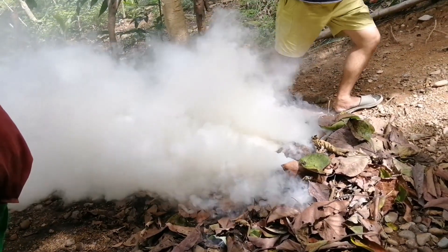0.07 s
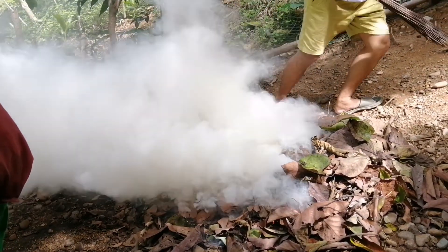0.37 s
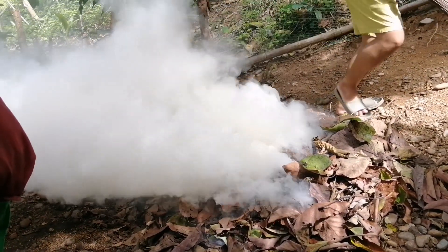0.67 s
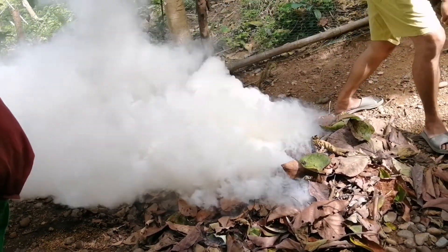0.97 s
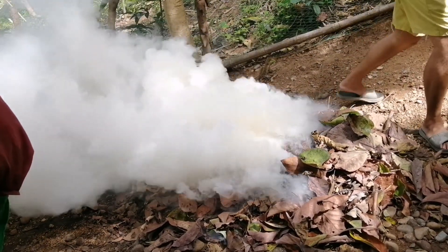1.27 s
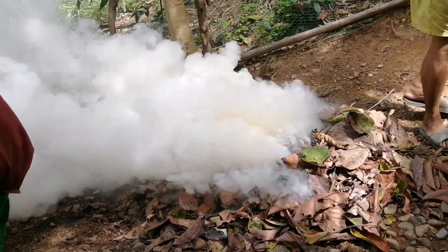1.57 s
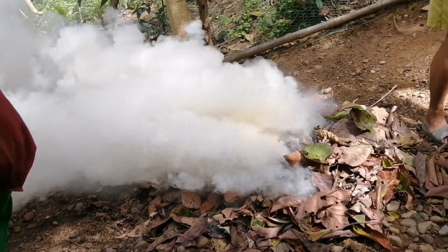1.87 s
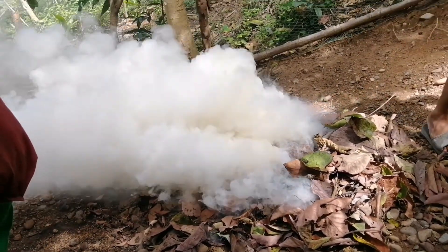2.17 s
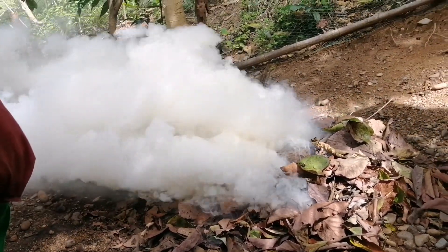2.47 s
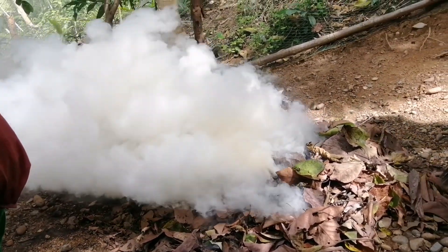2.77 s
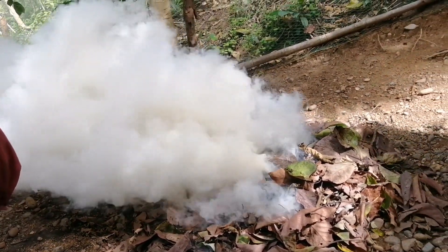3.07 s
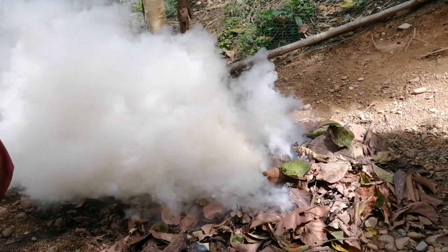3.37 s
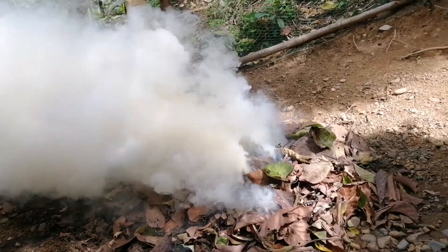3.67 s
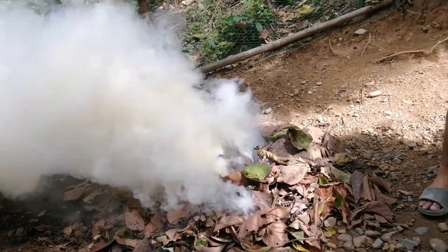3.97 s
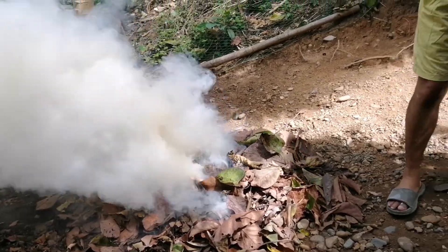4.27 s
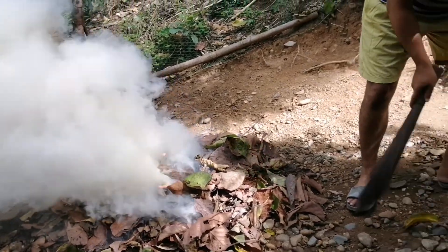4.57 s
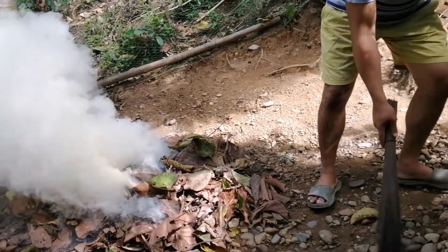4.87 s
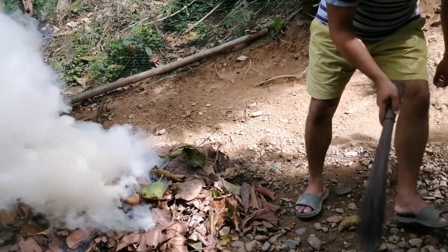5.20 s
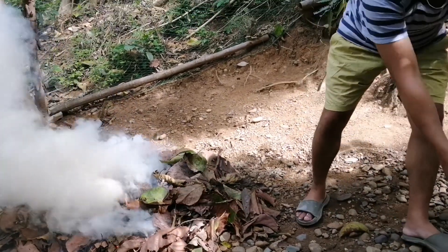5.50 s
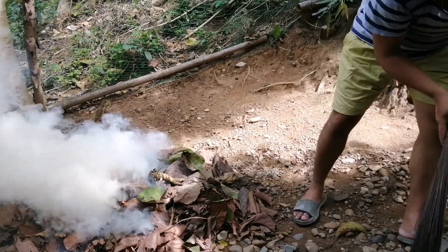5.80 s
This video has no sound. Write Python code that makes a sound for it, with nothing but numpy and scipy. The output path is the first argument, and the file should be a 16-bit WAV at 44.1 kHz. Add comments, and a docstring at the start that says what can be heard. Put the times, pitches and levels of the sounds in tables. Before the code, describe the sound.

A stiff broom swishes through dry leaves near the microphone, a little to the right, in quick scratchy strokes with sharp twig snaps and the crackle of settling leaves. Before the sweeping starts come a few sandal scuffs, cracking stalks and small chirps. A smouldering leaf pile ticks very faintly. The open-air background of low rumble, far engine throb and a whooping bird dips at each stroke and swells back.

```python
"""A sandal scuffs and dry stalks snap outdoors, over a low rumble and a distant one-cylinder engine.
A far bird whoops over and over, a smaller one chirps, rubber soles squeak. Then a stiff stick broom,
to the right of the microphone, sweeps dry leaves toward a faintly ticking, smouldering pile. Each swish
is a dense train of tiny impulses from leaf edges and leaves a rustle of settling leaves behind it.
Gain control ducks the background at every swish and lets it swell back."""
import sys
import numpy as np
from scipy import signal
from scipy.fft import rfft, irfft
from scipy.io import wavfile
from scipy.ndimage import uniform_filter1d, map_coordinates

SR = 44100
rng = np.random.default_rng(int(sys.argv[2]) if len(sys.argv) > 2 else 0)


def generate_wav(signal):
    """Clip the signal to [-1, 1] and save it as 16-bit WAV at the path in sys.argv[1]."""
    frames = np.transpose(np.atleast_2d(signal))
    scaled = np.clip(frames, -1, 1) * 32767
    pcm = np.round(scaled).astype(np.int16)
    wavfile.write(sys.argv[1], SR, pcm)


N = 266408
T = np.arange(N) / SR


def amp(db):
    """Amplitude ratio of a level in decibels."""
    return 10 ** (np.asarray(db) / 20)


def unit(x):
    """Normalisation to rms 1."""
    return x / np.sqrt(np.mean(x ** 2) + 1e-20)


def read(points, hz):
    """Interpolation on a log-frequency axis."""
    f, value = np.transpose(points)
    return np.interp(np.log(hz + 1), np.log(f + 1), value)


def shaped(x, response):
    """Zero-phase filtering by a function of frequency."""
    size = x.shape[-1]
    return irfft(rfft(x) * response(np.fft.rfftfreq(size, 1 / SR)), size)


def coloured(x, points):
    """Spectral shaping by a table of levels, at rms 1."""
    return unit(shaped(x, lambda hz: amp(read(points, hz))))


def add(mix, s, sound):
    """Superposition of a sound on the mix at time s."""
    part = mix[..., max(round(s * SR), 0):][..., :sound.shape[-1]]
    part += sound[..., :part.shape[-1]]


def pair(size, correlation):
    """Two channels of partly correlated white noise."""
    a, b = rng.standard_normal((2, size))
    return np.array([a, correlation * a + np.sqrt(1 - correlation ** 2) * b])


def wander(shape, samples):
    """Slow fluctuation: a moving average of noise, at rms 1."""
    return unit(uniform_filter1d(rng.standard_normal(shape), size=samples))


def swell(t, peak_s):
    """Critically damped envelope: a quick rise to 1 and a slower fall."""
    return t / peak_s * np.exp(1 - t / peak_s)


def smoothed(x, seconds):
    """First-order lag with the given time constant."""
    keep = np.exp(-1 / (seconds * SR))
    return signal.lfilter([1 - keep], [1, -keep], x)


def air(level_db=-45.5, rumble_hz=81):
    """Diffuse field: outdoor rumble and foliage hiss, coherent at the two ports only for long waves."""
    # ambient spectrum: (frequency [Hz], relative level [dB])
    spectrum = [(15, -8.5), (45, 5), (80, 4), (130, 3), (200, -10), (300, -7.5), (550, -13.5), (850, -12),
                (1400, -21), (3000, -24), (4500, -24), (8000, -35.5), (11000, -36.5), (16000, -65)]
    # likeness of the two microphone ports: (frequency [Hz], correlation [0-1])
    coherence = [(30, 0.9), (150, 0.72), (350, 0.93), (700, 0.45), (2000, 0), (15000, 0)]
    # drift of the deep rumble: (time [s], gain [dB])
    rumble_drift = [(0, -1.5), (4.2, -2), (4.8, 3), (6.04, 5.5)]
    left, other = rng.standard_normal((2, N))
    right = shaped(left, lambda hz: read(coherence, hz))
    right += shaped(other, lambda hz: np.sqrt(1 - read(coherence, hz) ** 2))
    wash = amp(level_db) * coloured(np.array([left, right]), spectrum)
    deep = shaped(wash, lambda hz: 1 / (1 + (hz / rumble_hz) ** 4))
    return wash - deep + deep * amp(np.interp(T, *np.transpose(rumble_drift)))


def engine(swell_s=0.0064, lead_s=0.0055, harmonic_db=-19):
    """Pulsed resonance: each firing rings the exhaust for a few cycles; only the bass carries this far."""
    # engine speed: (time [s], firing rate [1/s])
    speed = [(0.0, 22.39), (1.25, 21.7), (1.75, 23.22), (2.8, 23.4), (3.25, 22.14), (4.8, 23.13),
             (6.04, 23.69)]
    # drift of the exhaust: (time [s], level [dB], resonance [Hz])
    exhaust = [(.3, -30.5, 119), (1.0, -34, 119.7), (2.2, -34.5, 120), (3.3, -34.5, 127), (4.6, -34, 131.4),
               (6.04, -29.5, 139)]
    when, levels, resonances = np.transpose(exhaust)
    cycles = np.cumsum(np.interp(T, *np.transpose(speed))) / SR
    firings = T[1:][np.diff(np.floor(cycles)) > 0]
    t, out = np.arange(SR // 16) / SR, np.zeros(N)
    for s in firings:
        hz = np.interp(s, when, resonances) * (1 + 0.014 * rng.standard_normal())
        thud = -swell(t, swell_s) * np.cos(2 * np.pi * hz * (t - lead_s))
        add(out, s - lead_s, amp(np.interp(s, when, levels)) * thud)
    second_harmonic = amp(np.mean(levels) + harmonic_db) * np.sin(2 * np.pi * 2 * cycles)
    return out + second_harmonic


def sandals(scuff_peak_s=0.013, roughness=0.057):
    """Friction: grit rolls under a sole as band noise; stick-slip of rubber gives short, uneven squeaks."""
    # scuffs on packed earth: (time [s], level [dB], centre [Hz], width [Hz])
    scuffs = [(0, -39.5, 464, 300), (.327, -42.5, 1150, 2450), (.698, -46, 2160, 870),
              (.861, -45, 2450, 1030), (5.369, -43.5, 700, 1760), (5.403, -39, 600, 149),
              (5.49, -46, 280, 200)]
    # sole squeaks: (time [s], duration [s], level [dB], start pitch [Hz], end pitch [Hz])
    squeaks = [(0.862, 0.0174, -28, 1843, 2130), (1.011, 0.021, -35, 2000, 1880)]
    t, out = np.arange(SR // 3) / SR, np.zeros((2, N))
    for s, db, hz, width in scuffs:
        grit = unit(shaped(pair(len(t), 0.52), lambda f: 1 / (1 + ((f - hz) / width) ** 2) ** 2))
        add(out, s, amp(db) * grit * swell(t, scuff_peak_s))
    for s, length, db, start_hz, end_hz in squeaks:
        slide = np.minimum(t / length, 1)
        slip = 1 + roughness * wander(len(t), 40)
        cycles = np.cumsum((start_hz + (end_hz - start_hz) * slide) * slip) / SR
        add(out, s, amp(db) * np.sqrt(2) * np.sin(np.pi * slide) * np.sin(2 * np.pi * cycles))
    return out


def snaps(wood_hz=3050, wood_s=0.00097, splinter_s=0.0016, scatter_s=0.034, twig_count=14):
    """Brittle fracture: a stalk breaks in one impulse, rings, splinters and shakes the leaves nearby."""
    # larger stalks breaking: (time [s], level [dB], low knock [dB], treble crispness [dB])
    stalks = [(0.054, -23.5, -23, -2.5), (.432, -19.5, -0.5, -2), (.895, -45.5, -13, 18),
              (1.143, -32.5, -10, -2), (1.37, -44.5, -3, 4), (1.6332, -37.5, -4, 0.5), (2.047, -36, 3, -2),
              (2.141, -28, -23, -10.5), (2.308, -24, -26, 3), (2.482, -33, -34, 1), (3.21, -40.5, -13, 7),
              (3.8637, -32, -2.5, -1.5), (3.894, -36, -22, -3), (3.9378, -38.5, -11, -5),
              (3.992, -36, -19, -1.5), (4.1344, -28, -6, 7.5), (4.5086, -36, -6, 10.5),
              (4.805, -33, -18, 15), (5.089, -16.5, -20, -10), (5.192, -23.5, -5.5, 4.5),
              (5.6105, -35, -3, 5.5), (5.9574, -26.5, -2.5, -2.5)]
    # thin twigs break at random; same columns
    twigs = [(when * T[-1], -54 + 10 * force, -10, 5.5) for when, force in rng.random((twig_count, 2))]
    t, out = np.arange(-64, 4032) / SR, np.zeros((2, N))
    ring = amp(-22) * np.exp(-abs(t) / wood_s) * np.cos(2 * np.pi * wood_hz * t)
    crack = (t == 0) + (t > 0) * ring
    debris = (t > 0) * (amp(-11) * np.exp(-abs(t) / splinter_s) + amp(-34) * np.exp(-abs(t) / scatter_s))
    for s, db, knock_db, crisp_db in stalks + twigs:
        colour = [(60, knock_db + 5), (300, knock_db - 9.5), (1200, knock_db), (3000, 0),
                  (6500, crisp_db), (10500, crisp_db - 11.5), (16000, crisp_db - 22)]
        snap = coloured(crack + debris * pair(len(t), 0.22), colour)
        crack_rms = np.sqrt(np.mean(snap[:, t < 0.0035] ** 2))
        add(out, s + t[0], amp(db) * snap / crack_rms)
    return out


def whooping_bird(first_s=0.105, period_s=0.2288, length_s=0.18, low_hz=690, high_hz=990):
    """Glide and echo: a far bird repeats a rising whoop, and the hillside reflects it."""
    # strength of the whoops: (time [s], relative level [dB])
    levels = [(.2, -49.5), (1.6, -47.5), (3.2, -49), (4.6, -58), (5.8, -49)]
    echo_s, echo_db = 0.19, -2
    slide, out = np.linspace(0, 1, int(length_s * SR)), np.zeros(N)
    envelope = np.sin(np.pi * slide ** 1.6)
    starts = np.arange(first_s, T[-1], period_s)
    for s, (late, force, detune) in zip(starts, rng.standard_normal((len(starts), 3))):
        hz = (low_hz + (high_hz - low_hz) * slide ** 1.5) * (1 + 0.0142 * detune)
        flutter = unit(0.75 + wander(len(slide), 500))  # many paths through the trees
        gain = amp(np.interp(s, *np.transpose(levels)) + 1.7 * force)
        whoop = gain * flutter * envelope * np.sin(2 * np.pi * np.cumsum(hz) / SR)
        add(out, s + 0.00586 * late, whoop)
        add(out, s + echo_s, amp(echo_db) * whoop)
    return np.array([out, out])


def chirping_bird(length_s=0.1, arch=0.22, roughness=0.029):
    """Modulation: pitch and loudness arch together in each chirp; noise on both makes it raspy."""
    # a small bird's calls: (time [s], relative level [dB], top pitch [Hz])
    chirps = [(0.199, -49, 2860), (0.351, -43, 3180), (0.523, -43, 3240), (.69, -48, 3140),
              (0.851, -44.5, 3160), (1.04, -48.5, 3400), (2.141, -45, 2900)]
    arc, out = np.sin(np.linspace(0, np.pi, int(length_s * SR))), np.zeros(N)
    for s, db, top_hz in chirps:
        waver, rasp = wander((2, len(arc)), 110)
        cycles = np.cumsum(top_hz * (1 - arch * (1 - arc)) * (1 + roughness * waver)) / SR
        add(out, s, amp(db) * arc * unit(0.6 + rasp) * np.sin(2 * np.pi * cycles))
    return np.array([out, out])


def crackle(spectrum, per_s, spread_db, ring_s, correlation, kinds=24):
    """Shot noise: leaf edges catch and let go at random, each tick one of a set of short bursts."""
    t, out = np.arange(256) / SR, np.zeros((2, N))
    ticks = (rng.random(N) < per_s / SR) * amp(spread_db * np.minimum(rng.exponential(1, N), 4.5))
    leaf = rng.integers(0, kinds, N)
    for k in range(kinds):
        burst = unit(pair(len(t), correlation) * np.exp(-t / ring_s))
        out += signal.oaconvolve((ticks * (leaf == k))[None], burst, axes=1)[:, :N]
    return coloured(out, spectrum)


def clumped(x, clump_db, patchy_db):
    """Time-frequency modulation: leaves catch in clumps, and each clump rings in bands of its own."""
    spectra = signal.stft(x, nperseg=256)[2]
    clumps = wander(spectra.shape[2], 4)
    bands = uniform_filter1d(rng.standard_normal(spectra.shape[1:]), size=6, axis=0)
    patches = unit(uniform_filter1d(bands, size=5, axis=1))
    spectra *= amp(clump_db * clumps + patchy_db * patches)
    return unit(signal.istft(spectra, nperseg=256)[1][:, :N])


def tumbling(rate_hz=25, depth_db=2):
    """Random amplitude modulation: the uneven gain of leaves turning over in heaps."""
    slow = shaped(rng.standard_normal(N), lambda hz: np.exp(-(hz / rate_hz) ** 2))
    return amp(depth_db * unit(slow))


def broom(stroke_s=0.07, scrape_peak=0.48):
    """Sliding friction: each sweep hisses through leaves, scrapes the ground and leaves a dying rustle."""
    # strokes: (time [s], rise [s], hiss [dB], scrape [dB], settling [dB], settling time to -60 dB [s])
    sweeps = [(1.388, 0.042, -30, -51, -59, 0.31), (1.83, .063, -29.5, -52, -32, 0.78),
              (2.247, 0.054, -22.5, -64, -37.5, 1.61), (2.722, 0.064, -26.5, -39, -29, 0.93),
              (3.248, 0.04, -26, -44, -39.5, 1.11), (3.655, 0.052, -22.5, -33, -47, 1.5),
              (4.184, 0.049, -23, -47, -37, 0.87), (4.636, 0.026, -25, -43, -33.5, 0.55),
              (5.024, 0.04, -22.5, -36.5, -29.5, 0.61), (5.706, 0.041, -22, -27.5, -35.5, 0.84)]
    # spectrum of rubbed leaves: (frequency [Hz], relative level [dB])
    leaves = [(300, -61), (1000, -16), (1800, -10.5), (2600, -2), (4000, 0.5), (5500, 2), (7000, 2),
              (9000, -4), (11000, 0), (12500, -6), (14500, -10), (16000, -39)]
    # spectrum of bristles on the ground: (frequency [Hz], relative level [dB])
    ground = [(200, -44), (700, -2), (1400, 4.5), (2400, 5.5), (3500, 14), (5000, 10), (8000, -33),
              (16000, -36)]
    hiss = crackle(leaves, per_s=7000, spread_db=2.6, ring_s=0.00024, correlation=0.24)
    hiss = clumped(hiss, clump_db=0, patchy_db=1.5)
    scrape = crackle(ground, per_s=2500, spread_db=1.35, ring_s=0.00059, correlation=0.16)
    scrape = clumped(scrape, clump_db=-3.5, patchy_db=5)
    fine = crackle(leaves, per_s=2600, spread_db=3.3, ring_s=0.00056, correlation=0.039)
    coarse = crackle(ground, per_s=540, spread_db=5.6, ring_s=0.00034, correlation=0.5)
    settle = clumped(fine + amp(-3) * coarse, clump_db=2.5, patchy_db=3) * tumbling()
    out = amp(-62.5) * settle  # the smouldering pile keeps ticking
    for s, rise, hiss_db, scrape_db, settle_db, t60 in sweeps:
        t = np.maximum(T - s, 0)
        length = stroke_s + rise  # a stroke that bites slowly also lasts longer
        contact = 1 - np.exp(-(t / rise) ** 2)
        out += hiss * amp(hiss_db) * contact * np.exp(-(t / length) ** 2)
        out += scrape * amp(scrape_db) * swell(t, scrape_peak * length) ** 2
        out += settle * amp(settle_db - 60 * t / t60) * contact
    return out


def trees(x, t60, echoes_per_s=2500):
    """Scattering: trunks and the slope return sound as sparse, dying echoes."""
    t = np.arange(SR // 2) / SR
    taps = rng.choice([-1., 1.], (2, len(t))) * (rng.random((2, len(t))) < echoes_per_s / SR)
    taps *= amp(-60 * t / t60) * (t > 0.004)
    return signal.fftconvolve(x, taps / np.linalg.norm(taps[0]), axes=1)[:, :N]


def left_port(x, size=4096):
    """Cavity resonance: the left port colours its channel as a minimum-phase filter."""
    # response of the cavity: (frequency [Hz], gain [dB])
    response = [(30, -2), (140, 6.5), (300, 3.5), (600, 0), (1000, 3), (1500, 4), (1900, 2), (2500, 6.5),
                (3080, 10), (3600, 2), (4300, -2), (7000, 1), (9200, 4.5), (10800, -3.5)]
    log_gain = np.log(amp(read(response, abs(np.fft.fftfreq(size, 1 / SR)))))
    cavity = np.fft.ifft(np.exp(signal.hilbert(log_gain).conj())).real
    return signal.oaconvolve(x, cavity[:size // 2])[:N]


def gain_control(x, threshold_db=-37.5, share=0.34, recover_db_per_s=21.5):
    """Compression: loud, bright sounds turn both channels down together; the gain then creeps back."""
    sense_hz, sense_s, attack_s = 800, 0.011, 0.011
    bright = shaped(x, lambda hz: hz ** 2 / (hz ** 2 + sense_hz ** 2))
    level_db = 10 * np.log10(smoothed(np.mean(bright ** 2, axis=0), sense_s) + 1e-12)
    duck_db = share * np.maximum(level_db - threshold_db, 0)
    recovery = recover_db_per_s * T
    held_db = np.maximum.accumulate(duck_db + recovery) - recovery
    return x * amp(-smoothed(held_db, attack_s))


def scene():
    """Path difference: near sounds on the right reach the left port late; far ones arrive centred."""
    # the sweeper comes round toward the front: (time [s], left delay [s], left gain [dB])
    bearing = [(0, .00016, 0), (1.3, 0.00039, 2), (4.3, 0.00035, 1), (5.0, .00017, 0.5),
               (6.04, 0.00022, 5.5)]
    when, delays, gains = np.transpose(bearing)
    delay, left_db = np.interp(T, when, delays), np.interp(T, when, gains)
    near = broom() + snaps() + sandals()
    near[0] = amp(left_db) * map_coordinates(near[0], [(T - delay) * SR], order=5)
    birds = whooping_bird() + chirping_bird()
    far = amp(-5.5) * birds + amp(-10.5) * trees(birds, t60=0.13) + engine()
    return near + amp(-9.5) * trees(near, t60=0.23) + far + air()


def record(dry, edge_hz=15900):
    """Signal chain: the left port's resonance, then gain control, then a low-pass band limit."""
    ports = np.array([left_port(dry[0]), dry[1]])
    low_pass = signal.firwin(255, edge_hz, window=("kaiser", 8), fs=SR)
    return signal.oaconvolve(gain_control(ports), low_pass[None], "same", axes=1)


dry = scene()
out = record(dry)
generate_wav(out)
```